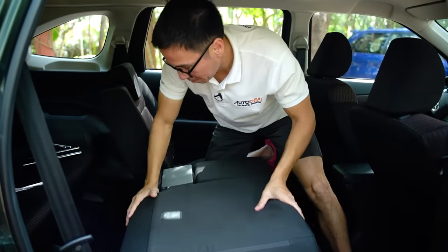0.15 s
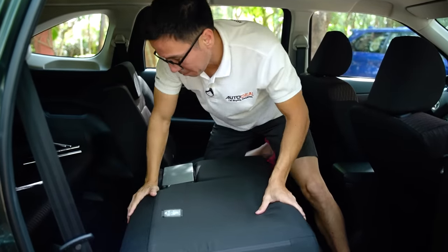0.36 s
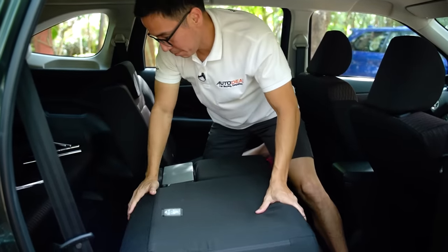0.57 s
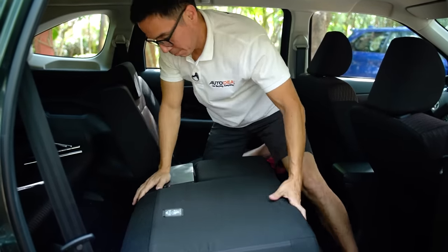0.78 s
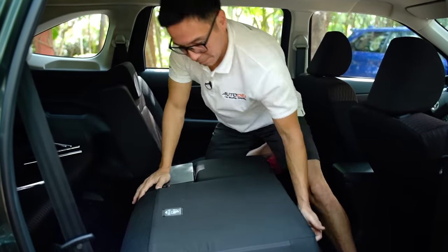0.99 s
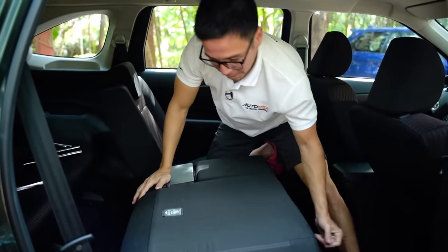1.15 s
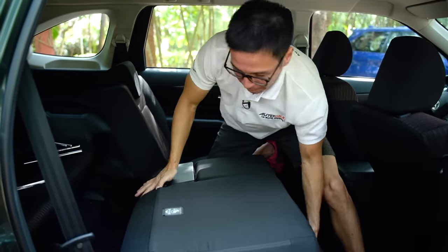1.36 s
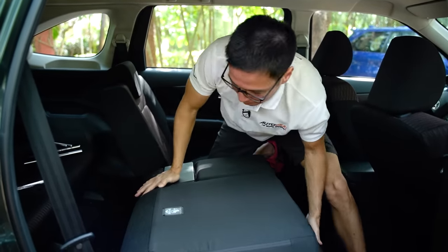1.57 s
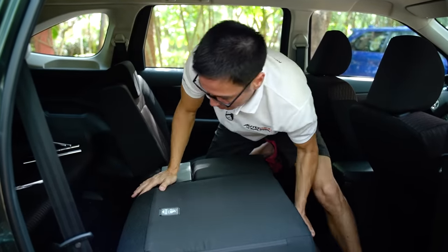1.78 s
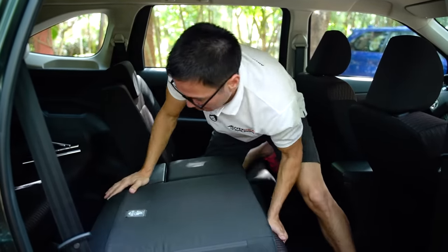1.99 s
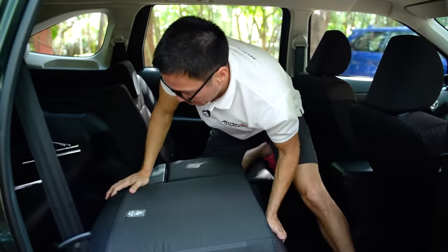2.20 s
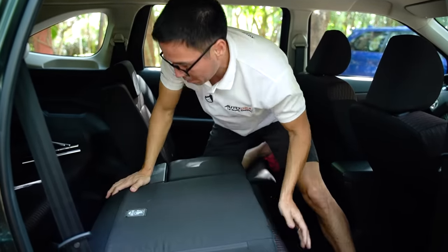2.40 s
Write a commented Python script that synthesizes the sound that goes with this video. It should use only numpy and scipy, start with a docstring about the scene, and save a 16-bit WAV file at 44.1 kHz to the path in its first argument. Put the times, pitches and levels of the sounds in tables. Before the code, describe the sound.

Folding a car's rear seat: one loud cushioned clunk, faint handling, then a second dull latching clunk.

```python
"""Padded blows into a seat frame: in a parked car a rear seatback is dropped flat, handled, then pushed
home into its latch. Each blow is one soft cycle of force, heard directly and through the ringing frame.
Grainy noise bursts make the crunch of latch and trim; slowly fading tones are the ringing steel, and
thin gliding tones the squeaking upholstery. Creaking and rubbing noise follows the weight on the seat,
over a low cabin hum and a steady hiss."""
import sys
import numpy as np
from scipy import signal
from scipy.fft import rfft, irfft, next_fast_len
from scipy.io import wavfile
from scipy.ndimage import map_coordinates

SR = 44100
rng = np.random.default_rng(int(sys.argv[2]) if len(sys.argv) > 2 else 0)


def transcribe(signal):
    """Save signal, clipped to [-1, 1], as a 16-bit WAV file at the path in sys.argv[1]."""
    frames = np.atleast_2d(signal).T
    limited = np.clip(frames, -1, 1)
    pcm = np.round(limited * 32767).astype(np.int16)
    wavfile.write(sys.argv[1], SR, pcm)


def volts_from_decibels(level):
    """Turn decibel levels (scalar or array-like) into linear amplitude factors."""
    exponent = np.asarray(level, float) / 20
    return 10 ** exponent


N = 108045  # length in samples
TIME = np.arange(N) / SR  # seconds

# padded blows into the frame: start_s, force_db, push_hz (one cycle of this pitch)
BLOWS = [(0.2021, -18.5, 302), (.210, -25, 510), (.216, -17.5, 444), (0.2206, -14.5, 262),
         (.2265, -20.5, 595), (0.2395, -20, 250), (0.2455, -17, 313), (0.2511, -23.5, 265),
         (.261, -30.5, 390), (.2705, -23.5, 235), (.285, -31, 557), (.299, -30.5, 252), (.315, -33, 151),
         (.955, -55.5, 200), (1.328, -52.5, 450), (1.363, -52, 494), (1.367, -48, 308), (1.418, -47.5, 560),
         (1.4245, -46, 540), (1.4305, -51.5, 600), (1.435, -47.5, 557), (1.4415, -41.5, 234),
         (1.512, -48, 640), (1.527, -50.5, 510), (1.997, -42, 606), (2.0465, -29.5, 412),
         (2.050, -19.5, 352), (2.053, -18, 432), (2.057, -16, 297.5), (2.063, -17, 315), (2.0662, -19, 269),
         (2.085, -21, 247), (2.096, -22.5, 530), (2.120, -29, 282), (2.131, -25, 317), (2.139, -30.5, 287),
         (2.150, -30.5, 200), (2.158, -30.5, 101.3)]
# ringing tones of the seat frame and panels: pitch_hz, relative_level_db, fall_60db_s
FRAME_MODES = [(104, 2, 0.065), (149.4, -1.5, 0.34), (200, 9, 0.044), (258.9, -2, 0.13), (296.7, -2, 0.16),
               (385, -19, 0.09), (540, -24, 0.06), (581, 1.5, 0.048), (687, -5, 0.089), (751, -8, 0.08),
               (985, -37, 0.044), (1220, -3.5, 0.05)]
PUSH_DB = -1  # the force heard directly

# crunches, scuffs and ticks of latch, trim and cloth:
# peak_s, level_db, rise_s, fall_60db_s, brightness_db_per_octave
CRUNCHES = [(.212, -31, 0.0041, 0.085, -4), (0.2206, -26.5, 0.0017, 0.011, 0.5),
            (0.234, -30, 0.011, 0.098, 0.5), (.246, -34.5, 0.0082, 0.051, -3.5),
            (0.264, -50, 0.0035, 0.064, -1), (.285, -49.5, 0.0088, 0.11, -1),
            (0.354, -51, 0.0083, 0.045, -4), (0.786, -64.5, 0.04, 0.24, 2.5),
            (0.946, -66.5, 0.015, 0.07, 0.5), (1.319, -65, 0.015, 0.033, 3),
            (1.3285, -57.5, 0.00085, 0.013, 2), (1.364, -66, 0.0037, 0.3, 2),
            (1.421, -52, 0.0079, 0.067, 3.5), (1.564, -61.5, 0.0006, 0.092, 2.5),
            (1.64, -65, .008, 0.049, 7), (2.045, -32, .004, 0.051, -4.5), (2.052, -27, 0.0073, 0.045, -0.5),
            (2.065, -32, 0.0095, 0.07, 0.5), (2.080, -56, 0.0031, .08, -13),
            (2.095, -50, 0.0053, 0.065, -1), (2.126, -45, 0.003, 0.053, -3.5),
            (2.151, -49, 0.0054, 0.061, -4.5)]
# tone colour of the crunches: frequency_hz, relative_level_db
CRUNCH_COLOUR = [(590, -16), (1000, -4.5), (1550, -4), (1840, -10), (2020, -4.5), (4540, -7.5), (5590, -9),
                 (13000, -22), (15800, -29.5)]
GRAIN_DB = 2  # depth of the fast random flicker

CABIN_DB, CABIN_T60_S = -18, 0.26

# floor pan and steel rods set ringing by the drop: pitch_hz, rms_level_db, middle_s, fade_6db_s
RODS = [(99, -34, .265, .055), (1497, -70, .42, .13), (2449, -67, .42, .15), (2449, -68, .675, .05),
        (2519, -60.5, .36, .19), (2799, -71, .46, .22), (2934, -69, .33, .025), (2934, -72, .57, .19),
        (3730, -75, .45, .13), (4269, -71, .335, .025), (4272, -76, .58, .16), (4366, -78, .48, .17)]
RODS_START_S, RODS_DAMPED_S, RODS_EDGE_S = 0.22, 0.73, 0.015
ROD_BEAT_DB, ROD_BEAT_HZ, ROD_WAVER_RAD = 2.2, 30, 0.5
# long rings after the slams, seat pan and floor low, latch striker high:
# start_s, pitch_hz, level_db, fall_60db_s
RINGS = [(.33, 262, -45, .8), (.33, 99, -45, .6), (.4, 165, -56, 1.5), (2.18, 258, -41, .9),
         (2.22, 140, -55, 1.2), (2.07, 6158, -61, .48)]
RING_RISE_S = 0.013

# squeaks of the upholstery, each a glide (time_s, pitch_hz, level_db)
# with the tones sounded at multiples of it (multiple_of_pitch, level_db)
SQUEAKS = [([(1.12, 5050, -86), (1.14, 5050, -80), (1.16, 4600, -85), (1.18, 4200, -89)], [(2, 0),
           (3, -5)]), ([(1.522, 4380, -79), (1.568, 4920, -71), (1.58, 5400, -71), (1.596, 6300, -79)],
           [(1, 0)])]

# weight shifting on the seat: time_s, creaking_frame_level_db, rubbing_cloth_level_db
WEIGHT_SHIFT = [(0, -64.5, -71), (.11, -66, -66), (.19, -58, -67.5), (.36, -54, -65), (.6, -65, -68.5),
                (.89, -60, -65), (1.1, -64, -68.5), (1.48, -71, -74), (1.61, -64, -68),
                (1.759, -66.5, -71.5), (1.786, -50, -69), (1.833, -65, -74), (1.929, -48, -69),
                (2.031, -36.5, -56), (2.17, -46, -69.5), (2.22, -53, -76), (2.45, -62.5, -70)]
# tone colour of the creaking frame: frequency_hz, relative_level_db
CREAK_COLOUR = [(88, -14.5), (150, -8), (263, -2), (341, -10), (461, -16), (562, -12.5), (1800, -41),
                (2340, -41), (3960, -120)]
# tone colour of the rubbing cloth: frequency_hz, relative_level_db
CLOTH_COLOUR = [(530, 0), (900, 2), (1310, 0), (1580, -6), (2850, -0.5), (15800, -25)]

# tone colour of the low cabin hum: frequency_hz, relative_level_db
HUM_COLOUR = [(30, -57), (60, -19), (95, 0), (150, 2.5), (210, -4), (330, -33.5), (600, -44)]
# tone colour of the steady hiss: frequency_hz, relative_level_db
HISS_COLOUR = [(180, -34), (300, 0.5), (1250, -11), (1550, -10.5), (4550, -16.5), (11900, -34),
               (15800, -53)]
HUM_DB, HISS_DB = -59, -69.5

LOW_CUT_HZ, TOP_HZ = 52, 15900


def unit(x):
    """Scale a sound to an rms of 1."""
    return x / np.sqrt(np.mean(x ** 2) + 1e-20)


def wobble(rate):
    """A smooth curve through random points, rate of them a second (2000 at most)."""
    points = rng.standard_normal(int(N * 2000 / SR) + 4)
    return map_coordinates(points, [np.arange(N) * min(rate, 2000) / SR])


def noise(colour, size=N, tilt_db=0):
    """Noise of rms 1, coloured by (Hz, dB) points and a tilt in dB per octave."""
    m = next_fast_len(size)
    hz = np.fft.rfftfreq(m, 1 / SR) + 1  # the 1 avoids log(0)
    points_hz, points_db = np.transpose(colour)
    colour_db = np.interp(np.log(hz), np.log(points_hz), points_db)
    gain = volts_from_decibels(colour_db + tilt_db * np.log2(hz / 4000))
    spectrum = rfft(rng.standard_normal(m)) * gain
    return unit(irfft(spectrum, m)[:size])


def add(track, s, sound):
    """Mix a sound into the track at a time in seconds."""
    part = track[round(s * SR):][:len(sound)]
    part += sound[:len(part)]


def frame_blows():
    """Each blow is one soft cycle of force, heard directly and setting the frame's modes ringing."""
    force = np.zeros(N)
    for s, db, hz in BLOWS:
        cycle = np.arange(round(SR / hz)) * hz / SR  # runs from 0 to 1
        add(force, s, volts_from_decibels(db) * np.sin(2 * np.pi * cycle) * np.sin(np.pi * cycle))
    t = np.arange(SR // 2) / SR
    ring = np.zeros(len(t))
    for hz, db, t60 in FRAME_MODES:
        ring += volts_from_decibels(db - 60 * t / t60) * np.cos(2 * np.pi * hz * t) * hz / SR
    return volts_from_decibels(PUSH_DB) * force + signal.fftconvolve(force, ring)[:N]


def crunches():
    """Rubbing and snapping parts: grainy noise bursts with a quick rise and an exponential fall."""
    out = np.zeros(N)
    lead = SR // 10  # samples kept ahead of each peak
    t = (np.arange(3 * lead) - lead) / SR
    grain = volts_from_decibels(GRAIN_DB * wobble(900))
    for s, db, rise, t60, tilt in CRUNCHES:
        shape = np.where(t < 0, np.exp(-(t / rise) ** 2), volts_from_decibels(-60 * np.abs(t) / t60))
        burst = noise(CRUNCH_COLOUR, size=len(t), tilt_db=tilt)
        add(out, s - lead / SR, volts_from_decibels(db) * shape * burst)
    return out * unit(grain)


def cabin(x):
    """The padded cabin answers with a short, dull tail of fading noise."""
    t = np.arange(SR // 3) / SR
    colour = [(80, -5), (1000, -10.5), (5000, -20.0), (15000, -40.0)]
    tail = noise(colour, size=len(t)) * volts_from_decibels(-60 * t / CABIN_T60_S)
    return volts_from_decibels(CABIN_DB) * signal.fftconvolve(x, tail / np.linalg.norm(tail))[:N]


def steel_rods():
    """Floor pan and rods ring as tones of uneven level and phase until a hand damps them."""
    edge_distance_s = np.minimum(TIME - RODS_START_S, RODS_DAMPED_S - TIME)
    free = np.clip(edge_distance_s / RODS_EDGE_S + 1, 0, 1)
    rods = np.zeros(N)
    for hz, db, middle, fade in RODS:
        level_db = db - 6 * ((TIME - middle) / fade) ** 4 + ROD_BEAT_DB * wobble(ROD_BEAT_HZ)
        phase = 2 * np.pi * hz * TIME + ROD_WAVER_RAD * wobble(ROD_BEAT_HZ)
        rods += volts_from_decibels(level_db) * np.sin(phase)
    return np.sqrt(2) * free * rods  # the root turns rms into peak


def long_rings():
    """Seat pan, floor and latch striker ring as single tones that die away exponentially."""
    out = np.zeros(N)
    for s, hz, db, t60 in RINGS:
        t = np.clip(TIME - s, 0, None)
        level_db = db - 60 * t / t60 + 1.5 * wobble(24)
        rise = 1 - np.exp(-t / RING_RISE_S)
        out += volts_from_decibels(level_db) * rise * np.sin(2 * np.pi * hz * t)
    return out


def squeaks():
    """Rubbed upholstery gives thin gliding tones of unsteady level."""
    out = np.zeros(N)
    for glide, tones in SQUEAKS:
        s, hz, db = np.transpose(glide)
        phase = 2 * np.pi * np.cumsum(np.interp(TIME, s, hz)) / SR
        level_db = np.interp(TIME, s, db, left=-150, right=-150) + 1.5 * wobble(200)
        mixed = sum(volts_from_decibels(tone_db) * np.sin(round(k) * phase) for k, tone_db in tones)
        out += volts_from_decibels(level_db) * mixed
    return out


def weight_shift():
    """Creaking frame and rubbing cloth are noises that swell and sink with the shifting weight."""
    s, creak_db, cloth_db = np.transpose(WEIGHT_SHIFT)
    creak_level = volts_from_decibels(np.interp(TIME, s, creak_db) + 1.5 * wobble(40))
    cloth_level = volts_from_decibels(np.interp(TIME, s, cloth_db) + 1.1 * wobble(40.67))
    return creak_level * noise(CREAK_COLOUR) + cloth_level * noise(CLOTH_COLOUR)


def hum_and_hiss():
    """The cabin hum is low noise that wavers a little; the hiss is steady noise."""
    hum = volts_from_decibels(HUM_DB + 1.25 * wobble(8.7)) * noise(HUM_COLOUR)
    return hum + volts_from_decibels(HISS_DB) * noise(HISS_COLOUR)


def scene():
    """All sources in one channel; the cabin answers only the blows and crunches."""
    hits = frame_blows() + crunches()
    ringing = steel_rods() + long_rings()
    mix = hits + cabin(hits) + ringing + squeaks() + weight_shift() + hum_and_hiss()
    return mix[None]


def roll_off(x):
    """The treble ends steeply here."""
    return signal.sosfilt(signal.butter(12, 15950, fs=SR, output="sos"), x)


def record(dry):
    """The microphone cuts the deep bass; a sharp band limit then removes everything above 15900 Hz."""
    low_cut = signal.butter(3, LOW_CUT_HZ, "high", fs=SR, output="sos")
    x = signal.sosfilt(low_cut, dry)
    m = next_fast_len(N + SR // 10)
    below_top = np.fft.rfftfreq(m, 1 / SR) < TOP_HZ
    mix = irfft(rfft(x, m) * below_top, m)[:, :N]
    return roll_off(mix)


dry = scene()
out = record(dry)
transcribe(out)
```